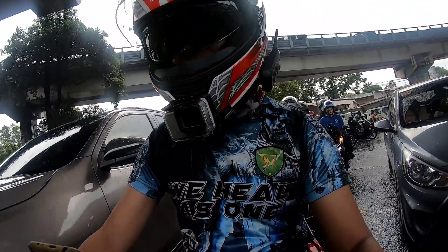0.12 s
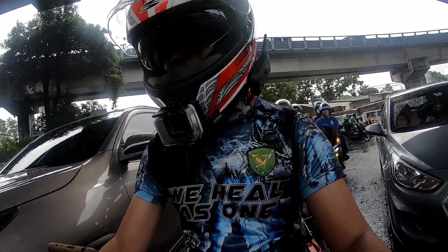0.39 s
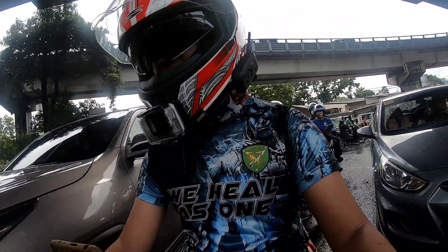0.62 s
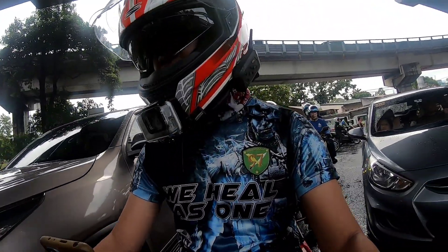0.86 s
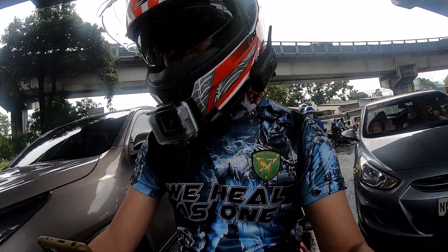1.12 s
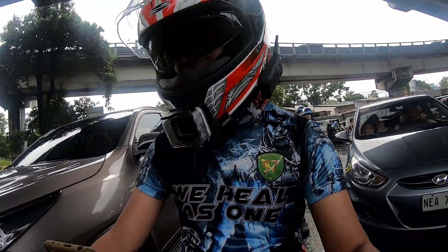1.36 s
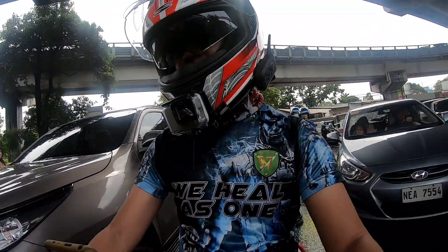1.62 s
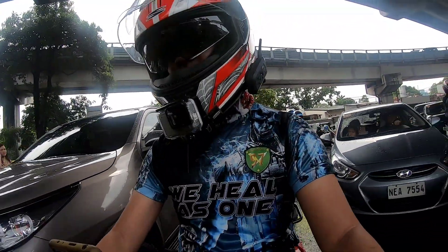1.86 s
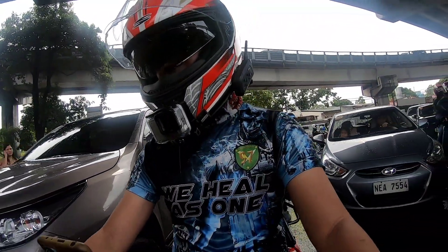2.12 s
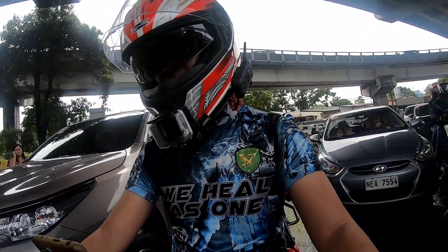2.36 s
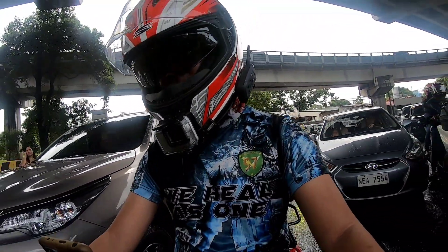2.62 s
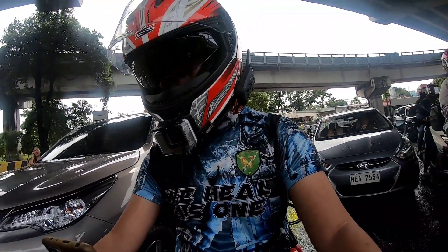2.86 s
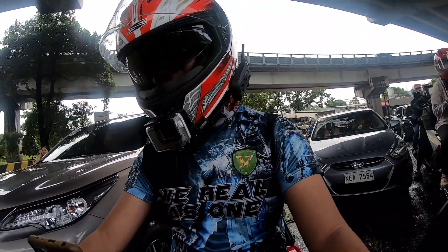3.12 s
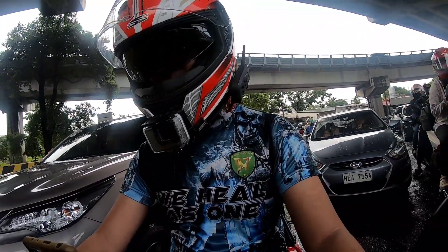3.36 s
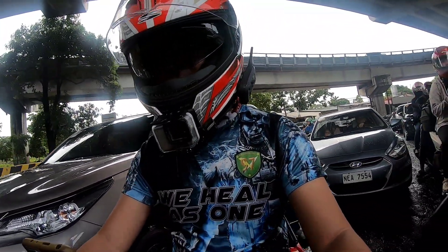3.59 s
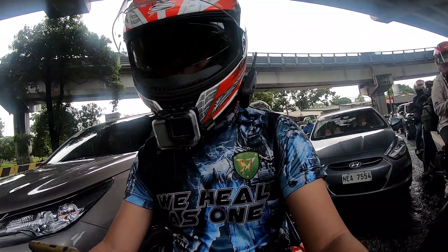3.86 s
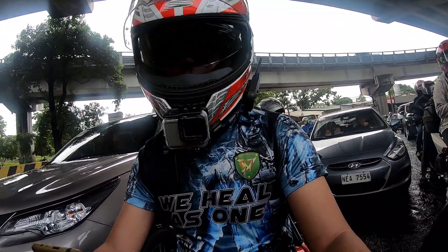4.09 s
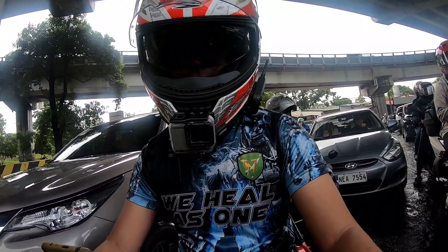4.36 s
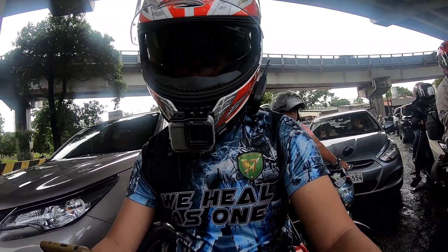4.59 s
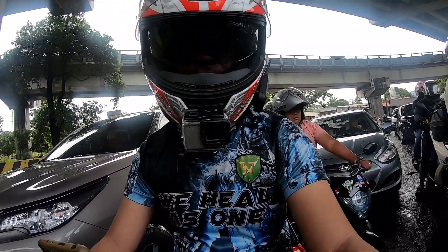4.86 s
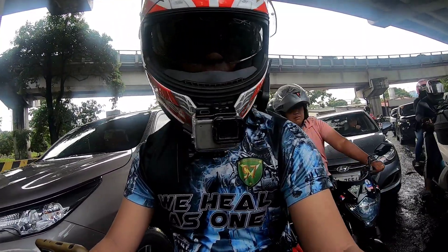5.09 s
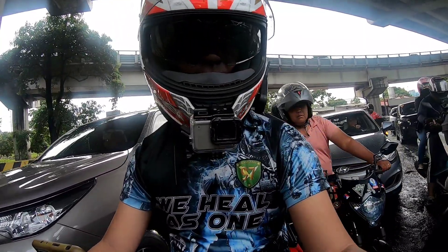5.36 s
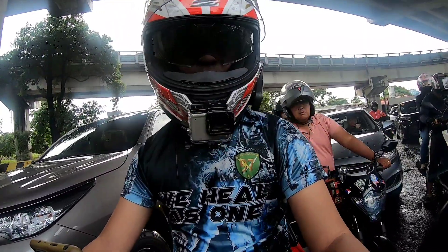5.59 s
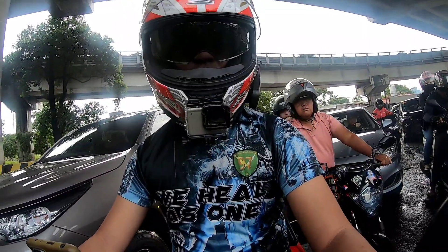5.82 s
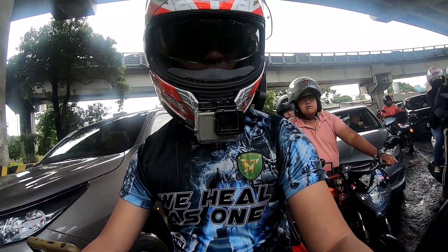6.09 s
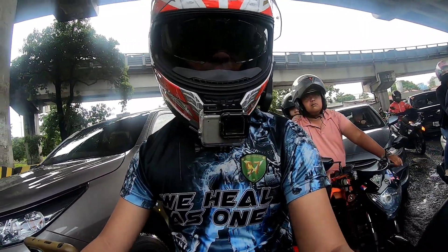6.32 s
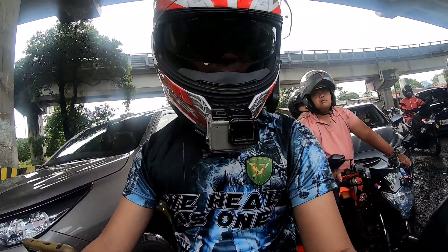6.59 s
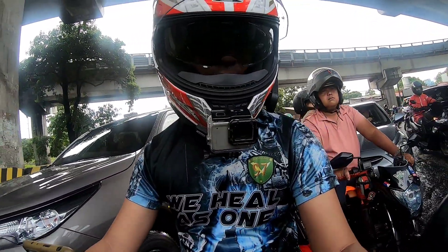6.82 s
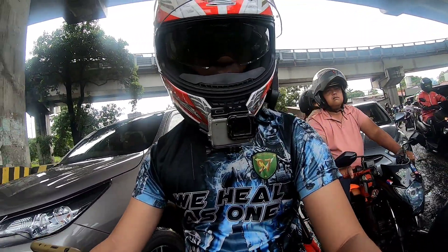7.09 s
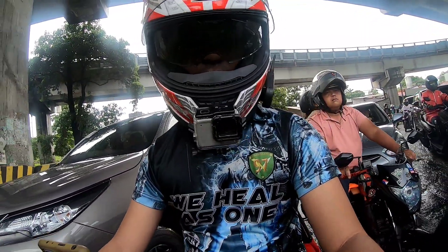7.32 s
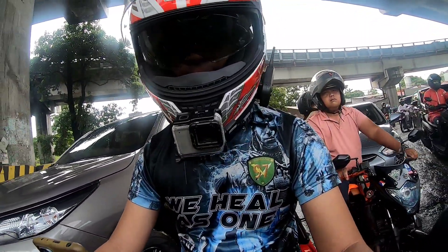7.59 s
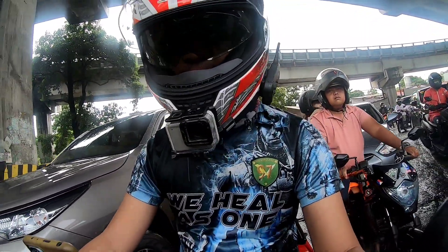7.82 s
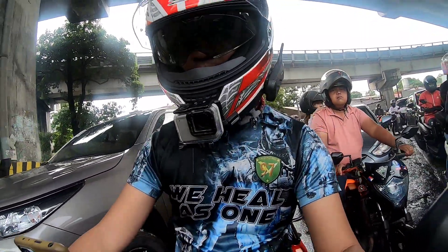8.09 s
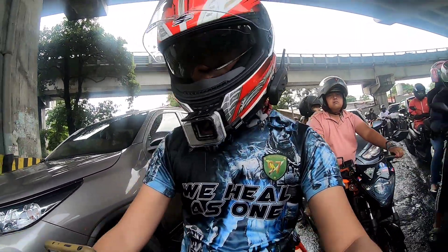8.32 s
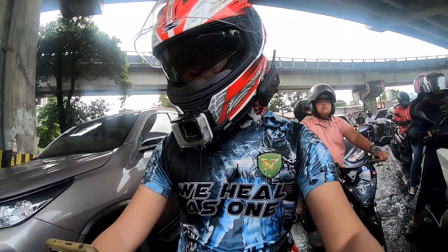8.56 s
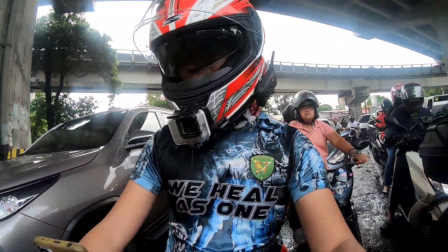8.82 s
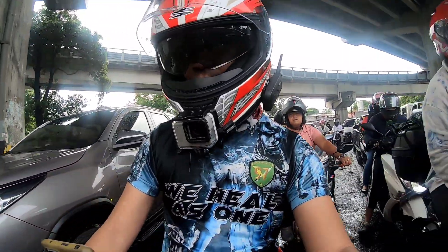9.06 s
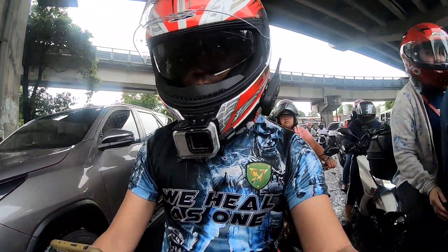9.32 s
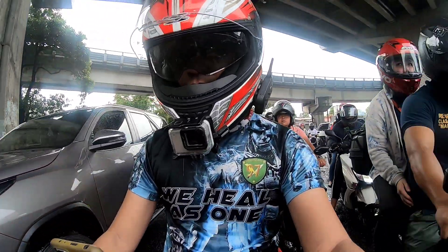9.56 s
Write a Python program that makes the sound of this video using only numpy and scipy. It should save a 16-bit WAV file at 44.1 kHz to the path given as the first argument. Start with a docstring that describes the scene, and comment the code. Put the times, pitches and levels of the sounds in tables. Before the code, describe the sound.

A scooter creeps through a wet traffic jam under a flyover, heard inside a plastic case on its handlebar. Throughout, a single-cylinder exhaust thumps about 22 times a second, blended with the low rumble, drone and muted growl of nearby engines and a very faint tyre hiss. Loose plastic ticks and buzzes up close from the start. At 2.0-2.2 s a fast clatter of ticks joins a thin high squeal; more rattling follows at 3.4 s and a hard knock with a creak at 4.1 s. The engine quickens from 4 s, peaks near 5 s, then falls back by 5.7 s as a bright brake squeal sounds and a strong knock hits at 5.85 s. Steady puttering resumes, with a chirp at 6.5 s and a sharp knock at 7.8 s. Short squeals at 8.7 and 9.0-9.2 s accompany a final dense clatter.

```python
"""Scooter in a jam

A small scooter creeps through a jam under a flyover, heard by a microphone shut in a plastic case on its handlebar.
Exhaust puffs rung through a pipe make the thump; shaped noise and brief tones make the other engines and the hiss.
Fluttering sines squeal and whistle for the brakes; noise and knocks ring the case, which buzzes and ticks
on its creaking mount. The peaks are squeezed softly."""
import sys
import numpy as np
from scipy import signal
from scipy.fft import rfft, irfft, next_fast_len
from scipy.io import wavfile
from scipy.ndimage import uniform_filter1d, map_coordinates

SR = 44100
rng = np.random.default_rng(int(sys.argv[2]) if len(sys.argv) > 2 else 0)


def amplitude_ratio(level_db):
    """Convert a level in decibels to the matching linear amplitude (field) ratio."""
    exponent = np.asarray(level_db, float) / 20
    return 10 ** exponent


def file_out(sig):
    """Save sig as 16-bit WAV at sys.argv[1]."""
    # one column per channel
    cols = np.atleast_2d(sig).T
    # limit, then scale
    lim = np.clip(cols, -1, 1)
    pcm = np.round(lim * 32767).astype(np.int16)
    wavfile.write(sys.argv[1], SR, pcm)


N = 427329


def unit(x):
    """Scaled to rms 1."""
    return x / np.sqrt(np.mean(x ** 2) + 1e-20)


def curves(rows):
    """One value per sample for each column after the time."""
    time_s, *columns = np.transpose(rows)
    return [np.interp(np.arange(N) / SR, time_s, column) for column in columns]


def wobble(rate):
    """A smooth random curve, rate knots a second."""
    knots = rng.standard_normal(int(N * rate / SR) + 4)
    return map_coordinates(knots, [np.arange(N) * rate / SR])


def filtered(x, response):
    """x times a complex response of frequency."""
    size = next_fast_len(N + 8192)
    return irfft(rfft(x, size) * response(np.fft.rfftfreq(size, 1 / SR)), size)[:N]


def ringing(x, modes, order=1):
    """x through causal resonances of alternating sign; raising them to an order darkens the valleys."""
    def body(f):
        total = 0
        for k, (centre_hz, width_hz, level_db) in enumerate(modes):
            damping = 1j * f * width_hz
            total = total + (-1) ** k * amplitude_ratio(level_db) * damping / (centre_hz ** 2 - f ** 2 + damping)
        return total

    return filtered(x, lambda f: body(f) ** order)


def noise(spectrum):
    """Noise of rms 1 coloured by (pitch_hz, level_db) points, all but silent outside them."""
    hz, db = np.transpose(spectrum)

    def colour(f):
        return amplitude_ratio(np.interp(np.log(f + 1), np.log(hz + 1), db, left=-120, right=-120))

    return unit(filtered(rng.standard_normal(N), colour))


def patchy(x, depth_db, size=4096):
    """x at rms 1 with slow, narrow patches of gain: short hums that come and go."""
    bins = signal.stft(x, nperseg=size)[2]
    field = uniform_filter1d(rng.standard_normal(bins.shape), size=2, axis=0)  # across pitch
    field = uniform_filter1d(field, size=4, axis=1)  # across time
    return unit(signal.istft(bins * amplitude_ratio(depth_db * unit(field)), nperseg=size)[1][:N])


def tone(rows, waver_hz, flutter_db, speed=35):
    """A short unsteady sine that follows its pitch and rms level and fades at both ends."""
    hz, db = curves(rows)
    t = np.arange(N) / SR
    first_s, last_s = rows[0][0], rows[-1][0]
    fade = np.clip(np.minimum(t - first_s + .01, last_s + .01 - t) / .02, 0, 1)
    phase = 2 * np.pi * np.cumsum(hz + waver_hz * wobble(2 * speed)) / SR
    return np.sqrt(2) * fade * amplitude_ratio(db + flutter_db * wobble(speed)) * np.sin(phase)


def held(start, length, start_hz, end_hz, db, swell_s, swell_db, sag_db):
    """Rows of a tone that comes to its level from swell_db below, then glides and sags to its end."""
    return [(start, start_hz, db - swell_db), (start + swell_s, start_hz, db), (start + length, end_hz, db - sag_db)]


# The scooter's single cylinder: time_s, firings_per_s
ENGINE = [(0, 21.9), (0.4, 22.45), (1.3, 22.35), (2.05, 21.1), (3.05, 21.4), (4.05, 23.1), (4.5, 26.0),
          (4.8, 27), (5.05, 28.6), (5.45, 27.4), (5.75, 21.3), (6.0, 22), (6.5, 22.2), (8.1, 22.3),
          (8.9, 22.8), (9.69, 22.6)]
# Its exhaust at the microphone: time_s, thump_db, bark_db
EXHAUST = [(0, -26, -36), (.8, -26.5, -37.5), (1.3, -20.5, -40.5), (2.0, -22.5, -33), (2.6, -23.5, -33.5),
           (3.4, -28, -30.5), (3.9, -31, -34.5), (4.4, -29, -33.5), (5, -19, -29), (5.2, -23, -34.5),
           (5.45, -21.5, -53), (5.7, -33.5, -43), (6.0, -25, -39.5), (6.5, -19, -34.5), (7, -30, -42),
           (7.9, -24, -36), (8.45, -19.5, -40), (9, -23, -37.5), (9.69, -21.5, -37)]
# Low and high resonances of the pipe, before the order is applied: pitch_hz, width_hz, level_db
PIPE = [(45.3, 29.4, -5.5), (117, 47.5, -1), (153.4, 55.8, 1), (181, 24.7, -2)]
BARK = [(280, 69, 0.27), (399.5, 80, 0.09)]


def scooter():
    """One exhaust puff per firing, uneven in size and slightly in time, rings the pipe: a low thump and a higher bark."""
    (rate,), (thump_db, bark_db) = curves(ENGINE), curves(EXHAUST)
    fired = np.flatnonzero(np.diff(np.floor(np.cumsum(rate) / SR)))
    jitter_s = .0003 * rng.standard_normal(len(fired))
    size_db = 1.2 * rng.standard_normal(len(fired))
    puffs = np.zeros(N)
    puffs[np.clip(fired + (jitter_s * SR).astype(int), 0, N - 1)] = amplitude_ratio(size_db)
    thump = amplitude_ratio(thump_db) * unit(ringing(puffs, PIPE, order=2))
    bark = amplitude_ratio(bark_db) * unit(ringing(puffs, BARK, order=4))
    return thump + bark


# Other engines around the scooter: time_s, rumble_db, drone_db, growl_db
TRAFFIC = [(0.0, -20.5, -18.5, -29.5), (0.32, -20, -21, -30), (0.38, -20, -19.5, -26.5),
           (0.48, -15, -20.5, -24), (0.67, -22, -20.5, -31), (1.56, -28.5, -20, -28.5),
           (4.05, -19.5, -21.5, -30), (5.3, -28, -19, -30), (5.61, -22.5, -23.5, -30.5),
           (5.94, -26.5, -18, -29), (6.72, -20, -20.5, -27.5), (7.23, -22.5, -21.5, -33),
           (7.72, -21, -15.5, -27.5), (8.55, -24.5, -29, -29.5), (9.58, -29, -19.5, -25.5),
           (9.69, -24, -22, -26)]
# Colours of the three engine layers, relative levels per Hz: pitch_hz, level_db
DEEP = [(12, -40.5), (19, -22.5), (24, -3.5), (40, 2), (70, 1), (90, 2.5), (120, -30)]
DRONE = [(55, -39), (75, -5), (110, 4.5), (150, 3), (185, 1.5), (210, -4.5), (240, -40)]
GROWL = [(120, -38.5), (210, -0.5), (263, -5), (370, -8), (465, -12.5), (553, -8.5), (615, -10.5),
         (838, -25.5), (1050, -32), (1180, -56.5), (1280, -41), (1660, -71)]
# Far wet tyres and fans: time_s, hiss_db, spray_db
HISS_LEVEL = [(0, -57.5, -77), (.8, -62, -82.5), (2.45, -58.5, -76), (4.5, -60.5, -80.5), (5.6, -60, -79.5),
              (7.05, -60, -80.5), (7.7, -59.5, -79.5), (9.69, -59, -80.5)]
# Colours of hiss and spray, relative levels per Hz: pitch_hz, level_db
HISS = [(1150, -19.5), (1950, -0.5), (2090, -6.5), (2350, -4.5), (2610, -3.5), (3200, 0), (3430, -4.5),
        (3890, -6.5), (4160, -10), (4460, -8.5), (5000, -15.5), (5600, -9.5), (5980, -10), (7000, -17.5),
        (8000, -39.5)]
SPRAY = [(6200, -19.5), (7400, 0), (10200, -8.5), (10900, -39.5)]
# Engine notes, some the scooter's, that stand out for a moment: start_s, length_s, start_hz, end_hz, level_db
NOTES = [(3.445, 0.96, 100.1, 95.8, -24), (3.864, 0.315, 301.7, 277.8, -26.5), (5.747, 0.47, 358, 342, -34),
         (6.64, 0.92, 81.5, 80.24, -22.5), (8.136, 1.38, 179.7, 181.7, -24.5)]


def traffic():
    """Other engines blur into rumble, drone and growl; a few engine notes, some the scooter's, stand out; tyres hiss."""
    rumble_db, drone_db, growl_db = curves(TRAFFIC)
    rumble = amplitude_ratio(rumble_db) * noise(DEEP)
    drone = amplitude_ratio(drone_db) * patchy(noise(DRONE), depth_db=1.5)
    growl_db = growl_db + 1.3 * wobble(5.7) + 0.83 * wobble(30)
    growl = amplitude_ratio(growl_db) * patchy(noise(GROWL), depth_db=2.5)
    hiss = 0
    for level_db, colour in zip(curves(HISS_LEVEL), (HISS, SPRAY)):
        hiss = hiss + amplitude_ratio(level_db + 0.68 * wobble(7.4)) * patchy(noise(colour), depth_db=1.5, size=1024)
    notes = [held(*row, swell_s=.13, swell_db=16.5, sag_db=1.5) for row in NOTES]
    standing_out = sum(tone(rows, waver_hz=2.5, flutter_db=2.5) for rows in notes)
    return rumble + drone + growl + hiss + standing_out


# Long brake squeals, one list of rows each: time_s, pitch_hz, level_db
SQUEALS = [
    [(2.0, 6600, -66), (2.012, 6590, -59), (2.022, 6460, -70), (2.048, 6493, -55), (2.126, 6744, -52),
     (2.204, 6719, -59), (2.25, 6750, -76)],
    [(5.16, 7404, -80), (5.225, 7420, -54), (5.25, 7380, -67), (5.34, 7420, -56), (5.39, 7458, -81)],
    [(5.38, 3800, -76), (5.42, 3773, -61), (5.48, 3773, -74), (5.62, 3757, -56), (5.78, 3749, -70)],
    [(5.54, 6739, -73), (5.65, 6812, -42), (5.685, 6796, -57), (5.725, 6901, -48), (5.75, 6842, -75)],
    [(7.835, 7480, -72), (7.855, 7465, -62), (7.885, 7470, -63), (7.92, 7480, -76)],
    [(8.712, 6110, -64), (8.736, 6143, -46), (8.748, 6160, -50), (8.76, 6180, -46), (8.772, 6200, -70),
     (8.79, 6280, -74)],
    [(8.96, 6780, -68), (8.98, 6750, -57), (9.03, 6800, -50), (9.09, 6870, -47), (9.15, 6820, -49),
     (9.19, 6730, -60), (9.205, 6700, -78)],
]
# Short brake chirps at their loudest: time_s, pitch_hz, level_db
CHIRPS = [(1.2, 8400, -72), (1.86, 6750, -68), (4.474, 7530, -57), (4.6, 7495, -68), (4.7, 7560, -68),
          (4.824, 7495, -47), (6.544, 7480, -50), (7.728, 7520, -67)]
CHIRP_RISE_DB_PER_S, CHIRP_FALL_DB_PER_S, SILENT_DB = 900, 430, -92
# Faint fluttering whistles: start_s, length_s, start_hz, end_hz, level_db
WHISTLES = [(-.05, .46, 4597, 4600, -64), (.4, .28, 4600, 4604, -72), (1.8, .2, 3584, 3584, -66),
            (2.1, .34, 3575, 3568, -64.5), (2.2, .38, 3135, 3130, -63), (2.48, .59, 4587, 4630, -71),
            (5.08, .12, 2375, 2370, -66), (5.47, .12, 2375, 2370, -66), (5.86, .11, 2370, 2360, -64),
            (6.13, .08, 2375, 2370, -64), (6.26, .095, 2370, 2365, -64), (6.24, .48, 3165, 3250, -61),
            (7.07, .23, 3830, 3860, -72), (7.78, .64, 3790, 3758, -67), (7.98, .45, 3205, 3190, -66),
            (8.8, .15, 6120, 6160, -67)]


def brakes():
    """Pads sticking and slipping on wet discs sing thin tones; faint whistles flutter more deeply and quickly."""
    chirps = []
    for peak_s, hz, db in CHIRPS:
        start_s = peak_s - (db - SILENT_DB) / CHIRP_RISE_DB_PER_S
        end_s = peak_s + (db - SILENT_DB) / CHIRP_FALL_DB_PER_S
        chirps.append([(start_s, hz, SILENT_DB), (peak_s, hz, db), (end_s, hz, SILENT_DB)])
    squealing = sum(tone(rows, waver_hz=9, flutter_db=.8) for rows in SQUEALS + chirps)
    whistles = [held(*row, swell_s=0.049, swell_db=4.0, sag_db=5.5) for row in WHISTLES]
    return squealing + sum(tone(rows, waver_hz=10, flutter_db=3, speed=60) for rows in whistles)


# The case round the microphone buzzing with the frame: time_s, back_wall_db, door_db
BUZZ = [(0, -55, -62), (.38, -49, -54.5), (.86, -51.5, -67), (1.13, -50, -47), (2.2, -49, -48.5),
        (2.72, -58, -60.5), (4.0, -52, -52), (4.24, -46, -50.5), (4.8, -62, -69), (5.26, -49.5, -58),
        (6.04, -53, -43.5), (6.31, -55, -73), (6.99, -49.5, -56), (7.45, -58, -64), (7.96, -46, -43.5),
        (8.2, -52.5, -58.5), (8.93, -53, -59), (9.31, -49.5, -50.5)]
FRONT_WALL_DB = -1.5  # against the back wall
# Resonances of the case before the order is applied, walls (two back, two front) and door: pitch_hz, width_hz, level_db
WALL = [(1428, 76, 5), (1576, 201, 2.5), (1740, 170, 4), (1970, 110, -10.5)]
DOOR = [(964, 150, 1.5), (1196, 250, -5.5)]


def buzz():
    """Dense tiny contacts of uneven size keep two walls and the door of the case ringing."""
    grit = amplitude_ratio(2.3 * wobble(22) + 0.88 * wobble(150)) * rng.standard_normal(N)
    back_db, door_db = curves(BUZZ)
    front_db = back_db + FRONT_WALL_DB + 0.5 * wobble(2.1)
    total = 0
    for level_db, modes in ((back_db, WALL[:2]), (front_db, WALL[2:]), (door_db, DOOR)):
        total = total + amplitude_ratio(level_db) * patchy(ringing(grit, modes, order=2), depth_db=2.5, size=1024)
    return total


# Ticks of the case on its mount, parts against an average tick: time_s, strength_db, thud_db, snap_db, edge_db
TICKS = [(0.045, -32, 11.5, 12, -11.5), (0.3412, -30.5, 4, -8, -12), (0.412, -30.5, -5, -12, -11.5),
         (0.477, -33, 13, 0, 8), (0.548, -38, -10, 16.5, 12.5), (.6564, -29, 7, -11.5, -7),
         (0.714, -24.5, -6, -0.5, -15), (.884, -32, 14, 4.5, -15.5), (1.068, -28.5, 0, -9.5, 2),
         (1.1343, -23.5, 6, 9, -1), (1.3397, -31, 2, -8, -9.5), (1.49, -21.5, 7, 8.5, -3),
         (1.53, -40, -5, 8, 10.5), (1.605, -40.5, -5, 0.5, 17.5), (1.575, -36.5, 1, 8, 14),
         (1.788, -25, 8, 7, -20.5), (1.833, -42, -4, 9.5, -4.5), (1.953, -25.5, 14, 9, -27),
         (2.0198, -36.5, 13, 14, 3.5), (2.0918, -31, 0, -2, 10.5), (2.1032, -30, 11, -2.5, -2.5),
         (2.1135, -30, 6, 4, 1), (2.127, -23.5, -6, -2, -2.5), (2.1438, -26, 7, 13.5, -3),
         (2.168, -23.5, 9, 3, -3), (2.2, -31.5, -8, -7.5, -12), (2.5478, -31, -7, -0.5, 9.5),
         (2.6, -37, -1, 9, 6), (2.8152, -36.5, -3, 12, 1.5), (2.9705, -22.5, 8, -2.5, 4),
         (3.4391, -32, 0, 2.5, 11.5), (3.4765, -23.5, 8.5, -5.5, -5), (3.516, -27, 4, 13, -9.5),
         (3.543, -31, 11, 6.5, -1.5), (3.656, -37, 0, 4.5, 10.5), (3.7024, -36.5, 3, 8.5, 14.5),
         (3.7686, -38, 1, 5.5, 17.5), (3.9275, -31, -9, 4, 0), (4.0365, -31.5, 10, 2.5, -6),
         (4.0709, -33, 7, -13.5, -4.5), (4.0824, -33, 5, 7.5, 8), (4.1397, -17, 2.5, -6.5, 1),
         (4.608, -36, 1, 15.5, -1.5), (4.9943, -31, -6, -10.5, 9), (5.036, -34, 13, 8, -5.5),
         (5.089, -29.5, 1, 11, -15.5), (5.0986, -22, 1, -3.5, -14.5), (5.1382, -32.5, 4.5, 2.5, 7.5),
         (5.21, -40.5, -2, 7.5, 17), (5.7528, -35, 9, 9.5, -0.5), (5.795, -29, -4, 7.5, 2.5),
         (5.853, -16, 3.5, -7.5, 0), (5.981, -28.5, 4, -7.5, -8.5), (6.001, -32, 4.5, 3, -3.5),
         (6.022, -35, 5, 6, -0.5), (6.2139, -27.5, 0.5, 3.5, 5), (6.2805, -34.5, -5, 8.5, 12),
         (6.4847, -21, 1.5, -2.5, -8), (6.9765, -33, 7.5, 6, -15.5), (7.8221, -19, 5.5, 8.5, -5.5),
         (7.835, -33, -8, 7.5, 9), (7.895, -34.5, 10, 12.5, 10), (8.2096, -30, -4, -19, -6.5),
         (8.4115, -26.5, -1, -18, -9.5), (8.4823, -27, 0, 5.5, 4.5), (8.5226, -41, 21.5, -2, -3.5),
         (8.547, -26.5, -3.5, -3, -9.5), (9.0829, -20.5, 4.5, 8.5, -7), (9.117, -27.5, -2, -0.5, -7),
         (9.127, -29, -3, 0, -5), (9.141, -30, -2, 0.5, -2), (9.155, -34.5, -5, 13.5, -5.5),
         (9.168, -24, 8, -3, 0), (9.187, -24, -6, 2, -2), (9.1916, -23.5, 2, -3, 2),
         (9.211, -31.5, -1, 1, -9.5), (9.2417, -26, 1, 6, -15), (9.2728, -26.5, -8, -0.5, -19.5),
         (9.294, -31.5, -2, 4.5, -12.5), (9.3453, -26.5, 7, -6, -15.5), (9.672, -23.5, 3.5, -9, -19)]
# How hard an average tick excites walls, thud, snap and edge, added to its strength: level_db
STRIKE_DB = [29.5, 26, 8, 1]
# Struck parts of the case, before the order is applied; the first is the walls while
# the contact damps them: pitch_hz, width_hz, level_db
KNOCK = [(1606, 644, 0.0012)]
THUD = [(692, 270, 1), (1125, 110, 0)]
SNAP = [(2160, 570, 1.5), (2910, 260, 1.84), (3730, 1200, -8.5)]
EDGE = [(4250, 660, -2.5), (5140, 550, -5), (6150, 720, 1)]
# Spells of dense clatter: start_s, length_s, knocks_per_s, strength_db
RATTLES = [(0.454, .1, 120, -44.5), (1.119, .08, 140, -38.5), (2.065, .14, 148, -39.5),
           (3.4, 0.17, 148, -43.5), (5.082, 0.065, 130, -40), (5.825, 0.042, 190, -32),
           (9.092, 0.2, 118, -43.5)]
# The mount creaking on after some knocks: start_s, length_s, pitch_hz, level_db
CREAKS = [(2.167, 0.15, 1090, -48), (4.15, 0.105, 1785, -40), (4.17, 0.18, 1050, -51),
          (4.26, .17, 1470, -48), (4.992, 0.026, 1566, -44), (5.885, 0.092, 1800, -40),
          (5.87, .16, 1450, -48), (6.15, 0.12, 1040, -48), (6.22, 0.04, 1560, -44), (6.53, 0.12, 1500, -48)]
RING_DB = -9  # how much the walls ring free after a knock
TICK_DELAY_S = .0013  # from the listed time to the knock, its burst of noise moved along with it
REBOUND_S, REBOUND_DB = 0.009, -17  # delay before its random stretch; average level against the tick
FAINT_TICK_DB, TICK_SCATTER_DB = -44, 3  # average strength of random small ticks; spread of random levels
CASE_MUFFLES_HZ = 7000


def ticks():
    """A sharp knock within a short burst of noise strikes four parts of the case; listed ticks rebound once."""
    def scattered(s, *average_db):
        return (s, *(TICK_SCATTER_DB * rng.standard_normal(4) + average_db))

    faint = [scattered(s, FAINT_TICK_DB, 0, 5, 5) for s in rng.uniform(.02, N / SR, size=45)]
    rebounds = []
    for s, db, *parts_db in TICKS:
        again_s = min(s + REBOUND_S * rng.uniform(0.48, 2.4), N / SR)
        rebounds.append((again_s, db + REBOUND_DB + TICK_SCATTER_DB * rng.standard_normal(), *parts_db))
    clatter = []
    for start_s, length_s, rate, db in RATTLES:
        times = start_s + np.cumsum(rng.exponential(1 / rate, size=40))
        clatter += [scattered(s, db, 0, -3, -6) for s in times if s < start_s + length_s]

    t = np.arange(-500, 600) / SR
    # the noise swells before the knock and dies after it
    burst = 0.09 * np.where(t < 0, amplitude_ratio(60 * t / 0.018), amplitude_ratio(-60 * t / 0.032))
    blows = np.zeros((4, N + 2 * len(t)))
    for s, db, thud_db, snap_db, edge_db in TICKS + rebounds + faint + clatter:
        knock = (t == 0) + burst * rng.standard_normal((4, len(t)))
        force = amplitude_ratio(db + np.add(STRIKE_DB, [0, thud_db, snap_db, edge_db]))
        start = round((s + TICK_DELAY_S + t[0]) * SR)
        blows[:, start:start + len(t)] += force[:, None] * knock

    struck = amplitude_ratio(RING_DB) * ringing(blows[0, :N], WALL, order=2)
    for blow, modes, order in zip(blows, (KNOCK, THUD, SNAP, EDGE), (2.94, 2, 2.0, 1.5)):
        struck = struck + ringing(blow[:N], modes, order=order)
    muffled = filtered(struck, lambda f: 1 / (1 + (f / CASE_MUFFLES_HZ) ** 10))
    # a creak starts 0.5 dB above its level
    creaks = [held(s, length_s, hz, hz, db, swell_s=0.0074, swell_db=-0.5, sag_db=5) for s, length_s, hz, db in CREAKS]
    return muffled + sum(tone(rows, waver_hz=14, flutter_db=3, speed=90) for rows in creaks)


def scene():
    """All sources reach the one microphone."""
    return (scooter() + traffic() + brakes() + buzz() + ticks())[None]


def top_cut(x):
    """Nothing passes above the cut-off."""
    return signal.sosfilt(signal.butter(12, 11000, fs=SR, output="sos"), x)


def record(dry):
    """Peaks are rounded off softly below 0.64 of full scale, and the last 300 samples fade."""
    soft = dry / (1 + np.abs(dry / .64) ** 3) ** (1 / 3)
    finished = soft * np.clip((N - np.arange(N)) / 300, 0, 1)
    return top_cut(finished)


dry = scene()
out = record(dry)
file_out(out)
```